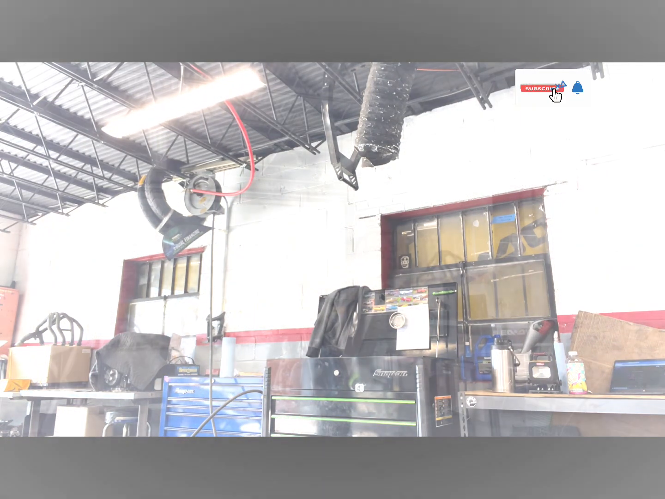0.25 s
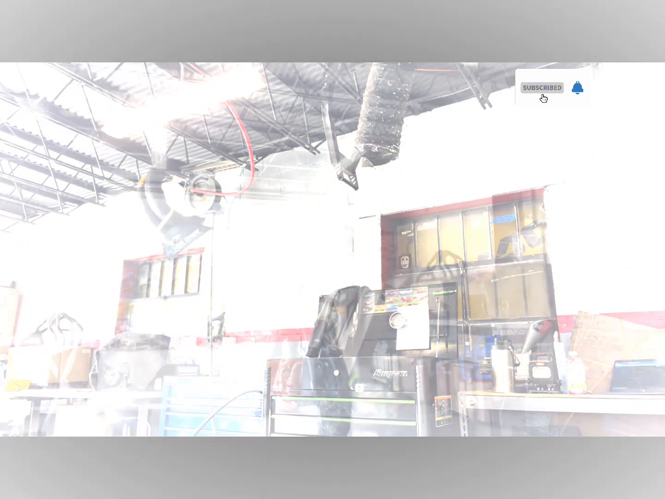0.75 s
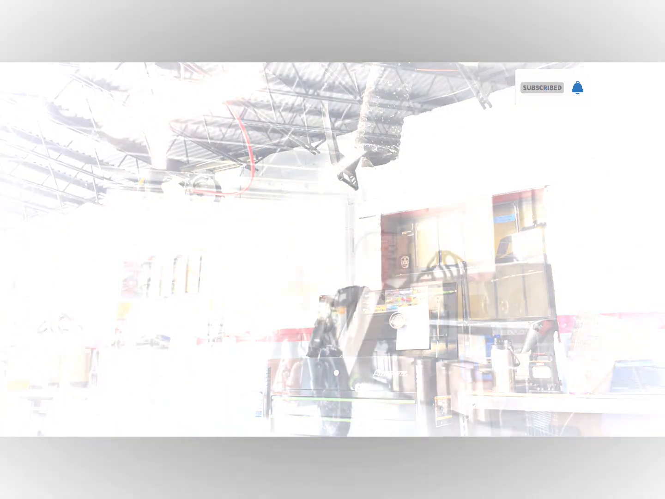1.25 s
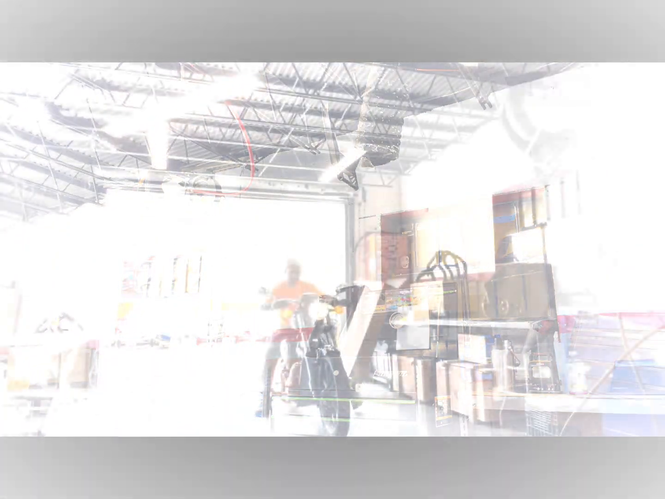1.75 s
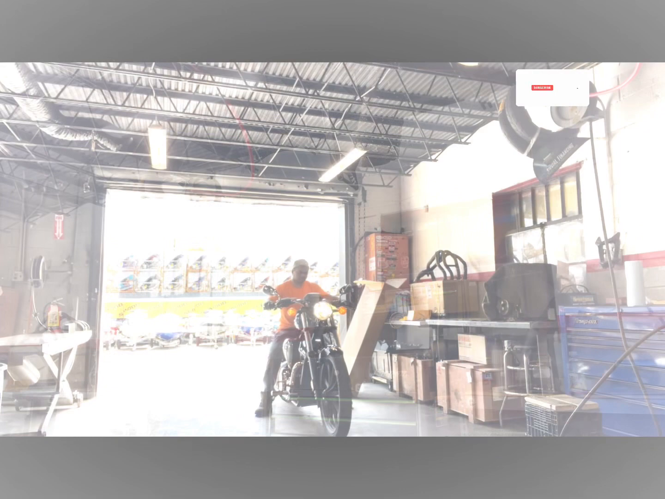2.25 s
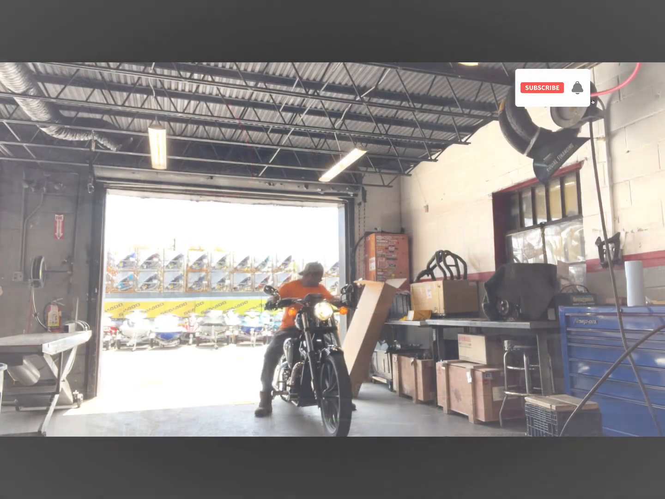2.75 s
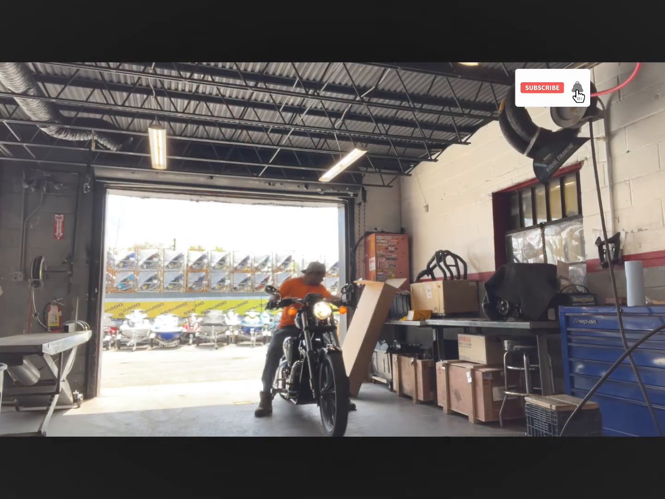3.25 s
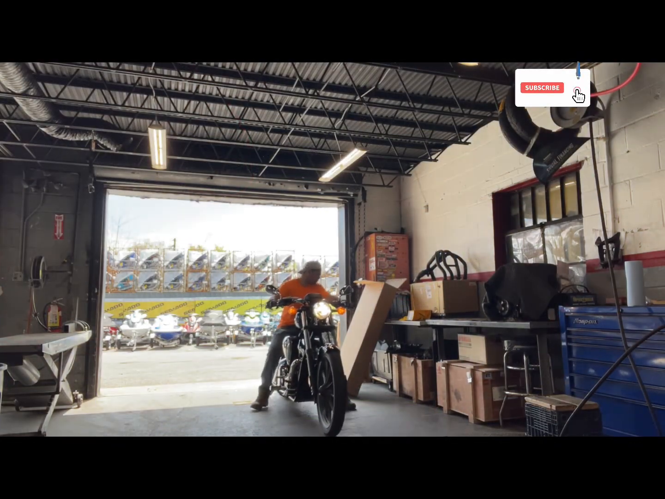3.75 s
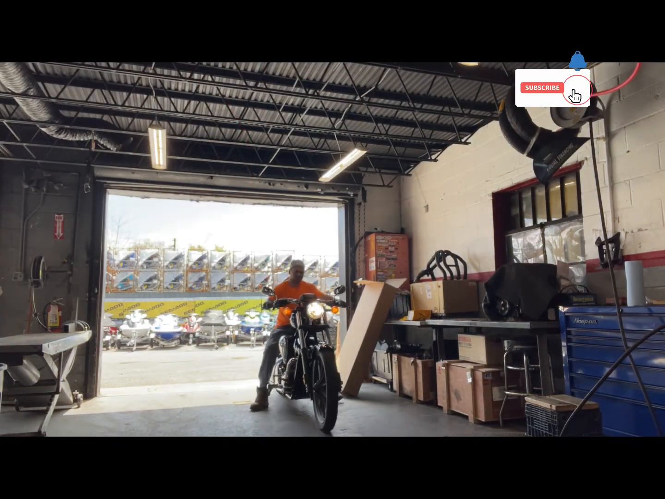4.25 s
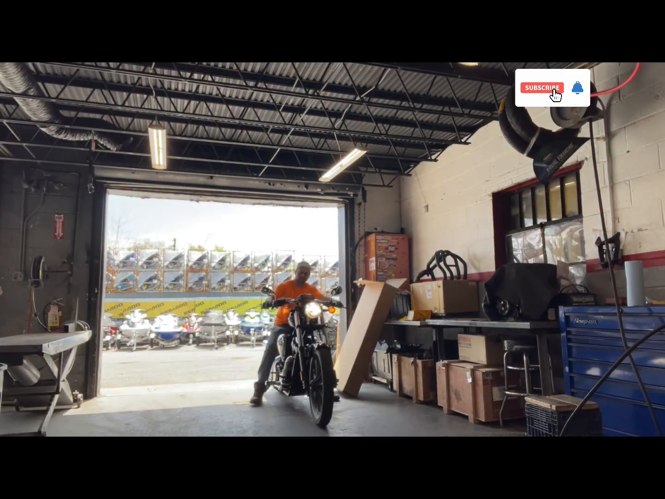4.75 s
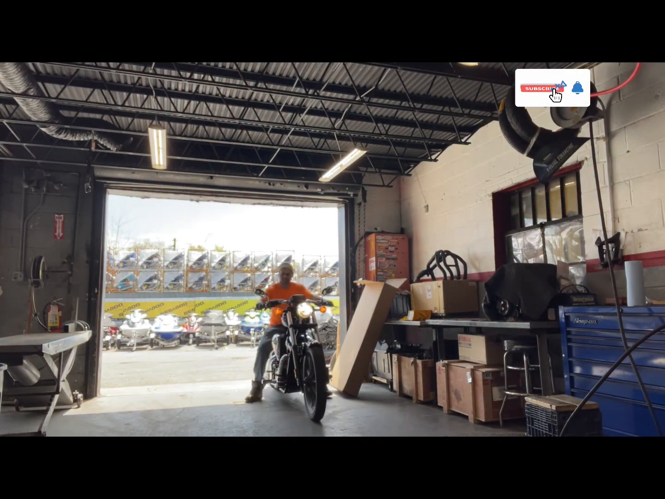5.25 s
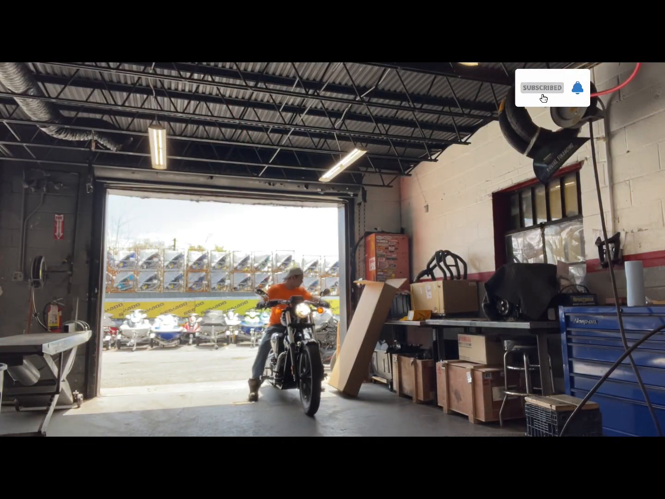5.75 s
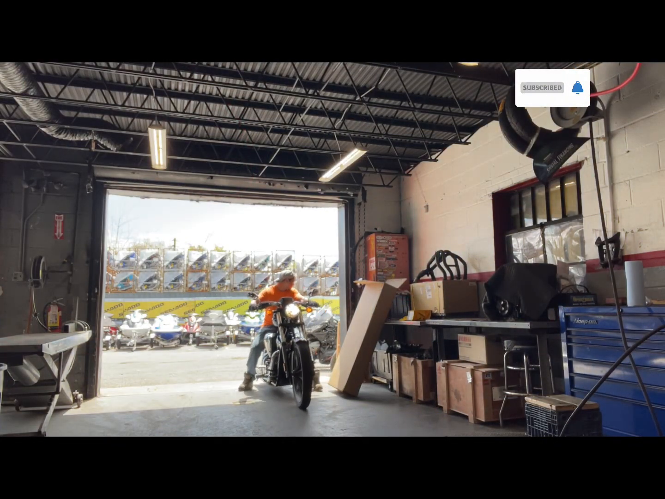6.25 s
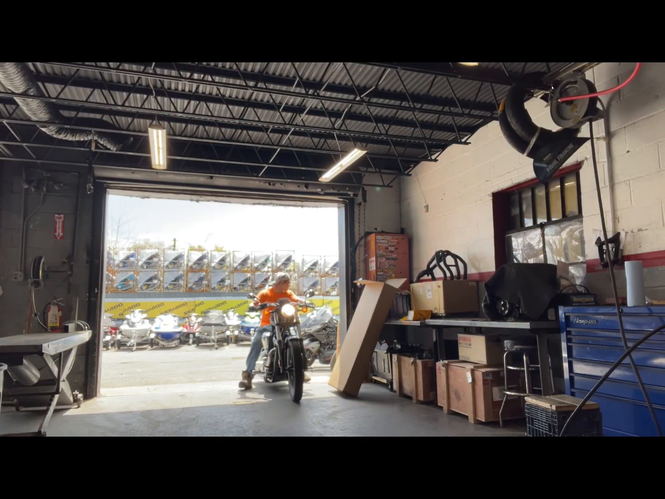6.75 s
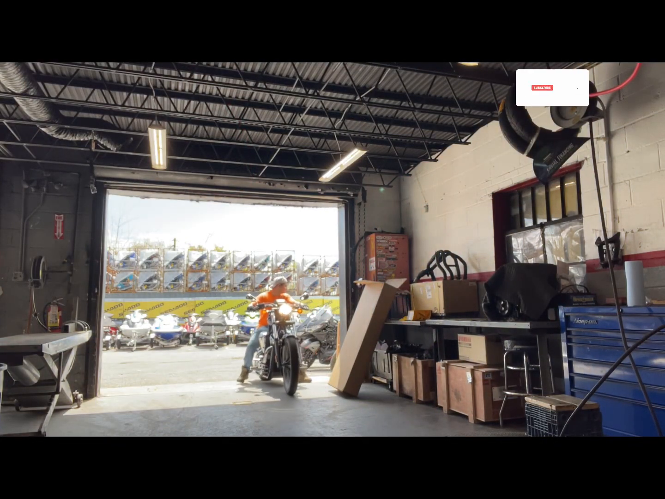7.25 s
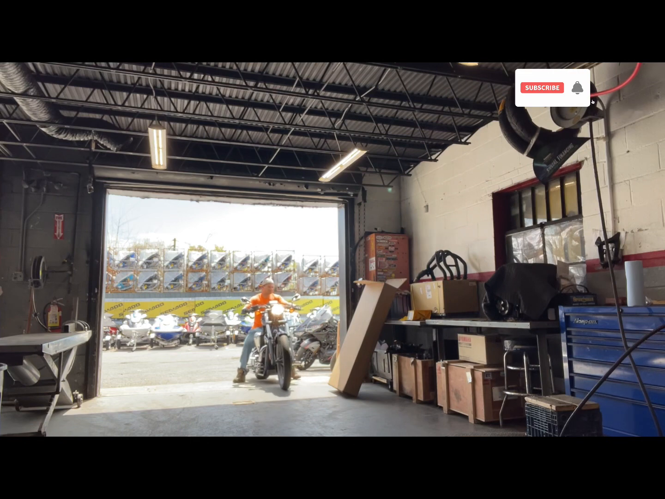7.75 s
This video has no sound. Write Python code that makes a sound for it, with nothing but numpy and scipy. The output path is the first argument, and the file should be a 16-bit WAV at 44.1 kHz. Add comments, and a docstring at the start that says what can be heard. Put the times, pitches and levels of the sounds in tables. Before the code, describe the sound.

A motorcycle engine chugs at idle in an echoing workshop bay, jumps louder with a click, then clunks into gear and keeps idling.

```python
"""Motorcycle idling in a workshop

A big two-cylinder motorcycle idles in a workshop bay and is walked backwards towards the open door.
Each firing thumps the pipes and the bay, and blows a puff of hiss over the engine's clatter.
Valves chink and tick, a hollow tone climbs near the door, and a gear clunks in, with two lighter
knocks later. Early on the sound jumps louder with a click."""
import sys
import numpy as np
from scipy import signal
from scipy.fft import rfft, irfft, next_fast_len
from scipy.io import wavfile
from scipy.ndimage import uniform_filter1d

SR = 44100
rng = np.random.default_rng(int(sys.argv[2]) if len(sys.argv) > 2 else 0)


def wav_out(sig):
    """Save sig, one row per channel (or a flat mono array), as 16-bit PCM at SR to the path in sys.argv[1]."""
    wavfile.write(sys.argv[1], SR, np.round(np.clip(np.atleast_2d(sig).T, -1, 1) * 32767).astype(np.int16))


N = 352359

JUMP_S = 1.2909  # when the sound jumps louder
RUN_IN = 20000  # samples for which the engine already runs before the start


def gain_of(db):
    """Turn decibels into a number to multiply by."""
    return 10 ** (np.asarray(db) / 20)


def evened(x):
    """Scale a sound to an average power of one."""
    return x / np.sqrt(np.mean(x ** 2) + 1e-20)


def level_at(points, hz):
    """Read a curve of (f/Hz, level/dB) points at any frequency."""
    f, db = np.transpose(points)
    return np.interp(np.log(hz + 1), np.log(f + 1), db)


def tinted(x, points):
    """Colour a sound with a curve of (f/Hz, level/dB) points."""
    size = next_fast_len(N)
    gains = gain_of(level_at(points, np.fft.rfftfreq(size, 1 / SR)))
    return irfft(rfft(x, size) * gains, size)[..., :N]


def spikes(times, sizes, before=0):
    """One spike at each time; the array starts `before` samples ahead of time zero."""
    out = np.zeros(N + before)
    at = np.round(np.asarray(times) * SR).astype(int) + before
    inside = (at >= 0) & (at < len(out))
    np.add.at(out, at[inside], (sizes * np.ones(len(at)))[inside])
    return out


def patchy_noise(colour_db, patchy_db):
    """Coloured noise with drifting louder and softer patches."""
    real, imag, patches = rng.standard_normal((N // 256 + 5, 513, 3)).T
    patches = evened(uniform_filter1d(uniform_filter1d(patches, size=10, axis=0), size=8, axis=1))
    spectra = (real + 1j * imag) * gain_of(colour_db[:, None] + patchy_db * patches)
    return signal.istft(spectra, nperseg=1024, noverlap=768)[1][:N]


def narrow_noise(phase, cutoff_hz):
    """Noise gathered round one pitch: a tone with a random wobble, mostly slower than the cutoff."""
    wobble = signal.lfilter(*signal.butter(2, cutoff_hz, fs=SR), rng.standard_normal((len(phase), 4)).T)
    return evened(((wobble[:2] + 1j * wobble[2:]) * np.exp(1j * phase)).real)


def firings(speed, first_s):
    """Firing times of the lead cylinder and the other one: each fires once in two engine turns."""
    t = np.arange(-RUN_IN, N + RUN_IN) / SR
    rpm = np.interp(t, *np.transpose(speed))
    cycles = np.cumsum(rpm) / (2 * 60 * SR)
    cycles -= np.interp(first_s, t, cycles)
    whole = np.arange(np.ceil(cycles[0]), cycles[-1] - 1)
    return np.interp(whole, cycles, t), np.interp(whole + .58, cycles, t)  # past halfway: an uneven beat


def pipe_ring(notes, lead, other, door):
    """Every firing rings the same low notes of the pipes and bay, never twice with equal strength."""
    # how strong the side is against the mid: f/Hz, level/dB
    side_colour = [(55, -36), (68, -22.5), (80, -13), (97, -10), (127, -4.5), (145, -18.5), (165, -14),
                   (182, -16.5), (206, -9.5), (222, -8), (240, -2), (256, -15), (360, -15)]
    out = np.zeros((2, N))
    lead_size, other_size = (gain_of(.6 * rng.standard_normal(len(s))) for s in (lead, other))
    for k, (hz, t60, lead_ms, lead_db, other_ms, other_db, door_db) in enumerate(notes):
        kicks = spikes(lead + lead_ms / 1000, lead_size * gain_of(lead_db), RUN_IN)
        kicks += spikes(other + other_ms / 1000, other_size * gain_of(other_db), RUN_IN)
        dying = np.exp((2j * np.pi * hz - np.log(1000) / t60) / SR)
        rising = dying * np.exp(-hz / 1.2 / SR)  # the note swells for about one vibration
        tone = signal.lfilter([0, dying - rising], [1, -dying - rising, dying * rising], kicks)[RUN_IN:]
        tone = tone * gain_of(door_db * door)
        # left and right hear each note a little out of step
        out += [tone.imag, (-1) ** k * gain_of(level_at(side_colour, hz)) * tone.real]
    return out


def thumps(t, early, door, before, after):
    """The exhaust thumps and their echoes: far off at first, then close after the jump."""
    # ringing notes of pipes and bay: f/Hz, time to fade by 60 dB (t60)/s, lead cylinder's delay/ms and
    # level/dB, other cylinder's delay/ms and level/dB, change at the door/dB
    near_notes = [(56.73, 0.4, -9.5, -14, -43, -13.5, -7), (66.2, 0.33, -35, -8.5, -29, -10, 0.5),
                  (76.8, 1, -36, -25, -17.5, -34, 4), (99.8, 0.39, -11, -17.5, -14, -11.5, -24),
                  (116.6, 0.24, -28.5, -22.5, -27, -21, 2.5), (128.5, 0.48, -9.5, -14.5, -7.5, -14, -6),
                  (144.75, 0.75, -2.5, -15.5, -1, -20.5, -2), (163.35, 0.25, -10.5, -17.5, 4.5, -19.5, 0.5),
                  (180.5, 0.6, -4, -16, 9.5, -25.5, -2.5), (207.9, 0.24, -2.5, -5, -2, -18, -14.5),
                  (223.53, 0.45, -0.7, -16.5, -15, -25.5, 2.5), (240.2, 0.52, -4, -18, -3.5, -23, -8.5),
                  (253.6, 0.42, -1.0, -17.5, -8, -31, -4), (267.7, 0.74, -5.5, -25.5, -26.5, -61, -2.5),
                  (280.6, 0.39, -3, -29.5, -8, -40, -1), (331.3, 0.7, -0.7, -30.5, 4.5, -46, -7),
                  (363.3, 0.55, 4.5, -25.5, -1.1, -43.5, -12.5), (398, 0.45, 2.5, -38.5, -0.5, -45, -7),
                  (421.6, 0.63, 3, -40.5, 0, -46, -4), (467.4, .5, 3.5, -40, 0, -47, 0)]
    # the same columns, heard from further off
    far_notes = [(59.3, 0.59, 6, -22.5, -23.5, -21.5, 0.0), (67.9, 0.59, -37.5, -31, -29, -16, 0.0),
                 (75.9, 0.65, -39, -46, -22.5, -29.5, 0.0055), (95.7, 0.34, -15.5, -28.5, -19, -28.5, 0.0),
                 (109.1, 0.52, -35.5, -24, -22.5, -25, 0.0), (130, 0.67, -12, -33.5, -3, -24, 0.0039),
                 (143.8, 0.4, -15, -36.5, -13.5, -19.5, 0.0051),
                 (158, 0.38, -14.5, -29.5, 6, -20.5, 0.0058), (181.9, 0.4, -1.5, -21.5, 9.5, -21, 0.0),
                 (208.8, 0.25, -0.5, -14.5, -10, -22, 0.011), (222.7, 1, -0.05, -24.5, -13, -41.5, 0.0057),
                 (236.7, 0.19, 0.3, -28, -16, -27, 0.0), (252, 0.88, -5.5, -34.5, -8, -42, 0.0)]
    far, near = pipe_ring(far_notes, *before, door), pipe_ring(near_notes, *after, door)
    far, near = far / np.std(far[0, early]), near / np.std(near[0, ~early])
    blend_s = .002
    boom = far + (near - far) * np.clip((t - JUMP_S) / blend_s, 0, 1)
    level_db = np.where(early, -18 + .65 * t, -12 + 3.2 * door)
    level_db = uniform_filter1d(level_db, round(blend_s * SR))
    return (boom + gain_of(-17) * bay_echoes(boom[0], t)) * gain_of(level_db)


def bay_echoes(x, t):
    """A blur of echoes; three echo tails take turns as rider and bike shift in the bay."""
    lag, t60 = np.arange(SR // 2) / SR, 1.0
    tails = rng.standard_normal((3, 2, len(lag))) * gain_of(-60 * lag / t60) * (lag > .015)
    turns = [np.cos(np.pi * (0.515 * t + k / 3)) for k in range(3)]
    echoes = sum(signal.oaconvolve((x * turn)[None], tail, axes=1)[:, :N]
                 for turn, tail in zip(turns, tails))
    echoes = signal.lfilter(*signal.butter(2, 85, "high", fs=SR), echoes)
    return echoes / np.sqrt(1.5 * np.sum(tails[0, 0] ** 2)) * gain_of([[0], [-1.5]])


def clatter(t, early, door, lead, other):
    """Engine noise through the metal casings, plus a puff of hiss at each firing that the bay draws out."""
    # overall colour of the clatter and hiss as heard, with a narrow gap near 9 kHz in the mid:
    # f/Hz, level/dB
    mid_colour = [(160, 2), (280, 0.5), (368, -7.5), (399, -10), (771, -9.5), (950, -14.5), (1490, -17.5),
                  (1690, -22), (2300, -22.5), (3780, -34.5), (6320, -36.5), (7920, -40), (8860, -70.5),
                  (10400, -40), (13000, -59)]
    # the same for the side: f/Hz, level/dB
    side_colour = [(160, -23), (280, 1.5), (484, -3.5), (625, -9.5), (1690, -20.5), (2230, -21),
                   (3780, -34.5), (8050, -37), (10400, -43.5), (11600, -72), (13000, -55)]
    # pitches that the casings boost: f/Hz, width/Hz, boost/dB
    casings = [(768.2, 13, 6), (1136, 42, 7), (1478, 61, 7), (2400, 96, 3.5), (2725, 42, 8),
               (5700, 330, 1.5)]
    # puffs against the steady noise: f/Hz, level/dB
    puff_colour = [(300, -14), (1000, -7.5), (3000, -6.5), (6000, 4.5), (12000, 2)]
    # change of colour before the jump: f/Hz, level/dB
    early_colour = [(300, -1), (450, -1), (800, -2.5), (1500, -3.5), (2700, -0.5), (5000, -3.5), (7500, -1),
                    (12000, -4)]
    hz, age = np.fft.rfftfreq(1024, 1 / SR), np.arange(SR // 5) / SR
    boost_db = sum(db / (1 + (2 * (hz - f) / width) ** 2) for f, width, db in casings)
    times = np.append(lead, other) - .012
    sizes = gain_of(2.2 * rng.standard_normal(len(times)))
    sizes[len(lead):] *= .75  # the other cylinder puffs more softly
    one_puff = (1 - np.exp(-age / 0.0024)) * gain_of(-60 * age / 0.41)
    pulsing = evened(signal.oaconvolve(spikes(times, sizes), one_puff)[:N])
    layers = []
    for colour, db in ((mid_colour, 0), (side_colour, -1.5)):
        colour_db = level_at(colour, hz) + boost_db
        steady = patchy_noise(colour_db, patchy_db=2.02)
        puffs = pulsing * patchy_noise(colour_db + level_at(puff_colour, hz), patchy_db=2.9)
        layers.append(gain_of(db) * (steady + puffs))
    out = np.array(layers) / np.std(signal.lfilter(*signal.butter(2, 500, "high", fs=SR), layers[0]))
    out += gain_of(-7.5 - 2.5 * door) * valve_chinks(times)  # fainter as the engine backs away
    level_db = np.where(early, -37, -30 - np.maximum(t - 3.88, 0))  # later sinks by 1 dB a second
    return np.where(early, tinted(out, early_colour), out) * gain_of(level_db)


def valve_chinks(times):
    """Near each firing the valve gear strikes; each time different parts ring loudest."""
    # ringing notes of casings and valve gear: f/Hz, level/dB, t60/s
    notes = [(762.5, 11.5, 0.46), (1160, 10.5, 0.17), (1466, 8.5, 0.15), (2240, -1, 0.11),
             (2330, -0.5, 0.14), (2604, 6.5, 0.1), (2756, -1.5, 0.076), (4750, -24, 0.09),
             (5060, -7, 0.079), (5560, -5, 0.085), (5900, -22, 0.13), (6040, -5, 0.23), (6570, -5.5, 0.16),
             (6930, -30, 0.068)]
    t, out = np.arange(SR // 5) / SR, np.zeros((2, N))
    swell = 1 - np.exp(-t / .004)  # the bay softens each strike
    draws = rng.standard_normal((len(times), len(notes), 4))
    for (hz, db, t60), (late, loud, mid, side) in zip(notes, draws.transpose(1, 2, 0)):
        ring = gain_of(db - 60 * t / t60) * swell * np.sin(2 * np.pi * hz * t)
        ring *= 1 + 0.14 * np.sin(2 * np.pi * .017 * hz * t)  # a nearby note makes it waver
        hits = [spikes(times + .012 * abs(late), gain_of(1.8 * loud) * np.tanh(share))
                for share in (mid, side)]
        out += signal.oaconvolve(hits, ring[None], axes=1)[:, :N]
    return evened(out)


def hollow_tone(t, early):
    """A breathy, hollow tone holds its pitch, then climbs and swells as the door nears."""
    hz = 437 + 36 * np.maximum(t - 5.9, 0)
    swell_db = np.where(early, 0, 7.5 * np.exp(-((t - 7.13) / 1.25) ** 2))
    tone = narrow_noise(2 * np.pi * np.cumsum(hz) / SR, cutoff_hz=32)
    return tone * gain_of(-41 + swell_db) * [[1], [.6]]


def click():
    """A sudden step that quickly dies away, just where the sound jumps louder."""
    decay = np.exp(-1 / (0.0011 * SR))
    return -signal.lfilter([1], [1, -decay], spikes([JUMP_S], gain_of(-11.5)))


def gear_clunk():
    """Heavy steel knocks home: short rings and a crash of noise dying in the bay."""
    # the clunk, its bounces and two later knocks: t/s, level/dB
    knocks = [(2.029, -19), (2.05, -36), (2.075, -27), (3.791, -34), (7.338, -37)]
    # colour of the crash as heard: f/Hz, level/dB
    crash_colour = [(180, -40), (300, -5), (849, 6), (1700, -6), (2440, -5.5), (3350, -12.5), (5380, -12),
                    (9050, -32.5), (10600, -30), (13000, -41)]
    # ringing notes of the steel: f/Hz, level/dB, t60/s
    notes = [(787, 4, 0.83), (835, -4, .4), (960, 2, 0.27), (1400, 2, 0.28), (1890, -12, 0.27),
             (2340, -13, 0.26), (2820, -9, .3)]
    times, levels_db = np.transpose(knocks)
    hits, t = spikes(times, gain_of(levels_db)), np.arange(SR // 2) / SR
    ring = sum(gain_of(db - 60 * t / t60) * np.sin(2 * np.pi * hz * t) for hz, db, t60 in notes)
    crash = signal.oaconvolve(hits, (1 - np.exp(-t / 0.0038)) * gain_of(-60 * t / 0.56))[:N]
    colour_db = level_at(crash_colour, np.fft.rfftfreq(1024, 1 / SR))
    noise = np.array([evened(patchy_noise(colour_db, 4.5)), 0.86 * evened(patchy_noise(colour_db, 1.5))])
    return crash * noise + [[1.3], [.8]] * signal.oaconvolve(hits, ring / abs(ring).max())[:N]


def valve_ticks():
    """The loudest valve ticks: short bursts of hiss, each ringing round one high pitch."""
    # single ticks: t/s, level/dB, f/Hz
    ticks = [(2.616, -42, 5200), (2.7393, -44, 5870), (2.7907, -38, 6300), (2.8645, -36.5, 5920),
             (3.2467, -37.5, 6240), (3.3737, -36, 6300), (3.497, -38, 6230), (3.7425, -45, 6100),
             (4.246, -37, 5360), (5.1663, -37, 5740), (5.2357, -40, 6500), (5.412, -37, 5400),
             (6.7063, -40, 5380), (7.0166, -42.5, 5340)]
    t, out, t60 = np.arange(SR // 5) / SR, np.zeros((2, N)), 0.12
    for start_s, db, hz in ticks:
        ring = narrow_noise(2 * np.pi * hz * t, cutoff_hz=250)
        tick = gain_of(db - 60 * t / t60) * (1 - np.exp(-t / .0015)) * ring
        slot = out[:, round(start_s * SR):][:, :len(t)]
        slot += tick[:, :slot.shape[1]]
    return out * [[1], [.7]]


def scene():
    """Add up the sounds as mid (what both ears share) and side (how they differ), then left and right."""
    # engine speed before the jump, and wandering up and down after it: t/s, speed/rpm
    early_idle = [(0, 1042.1), (.4, 1055.3), (1.2, 1022.5)]
    idle = [(1.33, 966.5), (1.96, 997.5), (2.09, 974.5), (2.55, 978.4), (3.1, 936.2), (3.73, 988.7),
            (4.04, 934.1), (4.36, 976.0), (5.12, 970.4), (5.25, 941.9), (5.83, 1024.0), (6.4, 981.3),
            (6.53, 924.3), (7.12, 936.8), (7.42, 1019.8), (7.9, 950.5)]
    # the walk backwards: t/s, share of the way to the door/0-1
    walk = [(3.3, 0.1), (4.3, 0.15), (5.8, 0.74), (6.8, 0.92), (7.3, 0.77), (7.99, 0.8)]
    t = np.arange(N) / SR
    door, early = np.interp(t, *np.transpose(walk)), t < JUMP_S
    before, after = firings(early_idle, first_s=.0231), firings(idle, first_s=1.3312)
    lead, other = (np.append(a[a < JUMP_S], b[b >= JUMP_S]) for a, b in zip(before, after))
    engine = thumps(t, early, door, before, after) + clatter(t, early, door, lead, other)
    mid, side = engine + hollow_tone(t, early) + gear_clunk() + valve_ticks()
    return np.array([mid + side, mid - side]) + click()


def record(dry):
    """Colour the left side, cut the deepest bass, round off the peaks and cut the highest treble."""
    # left against right: f/Hz, level/dB
    left_colour = [(60, -0.5), (150, -1.5), (360, -1.5), (870, -3), (2120, 1.5), (5160, 1), (12600, 5)]
    stereo = np.array([tinted(dry[0], left_colour), dry[1]]) * gain_of(0.1)
    stereo = signal.lfilter(*signal.butter(2, 30., "high", fs=SR), stereo)
    rounded = 1.222 * np.tanh(stereo / 1.23)
    treble_cut = signal.firwin(511, 13400, window=("kaiser", 9), fs=SR)
    return signal.oaconvolve(rounded, treble_cut[None], "same")


dry = scene()
out = record(dry)
wav_out(out)
```